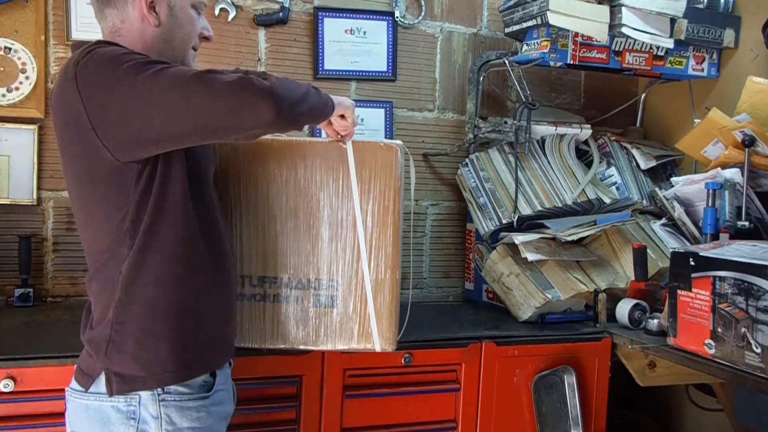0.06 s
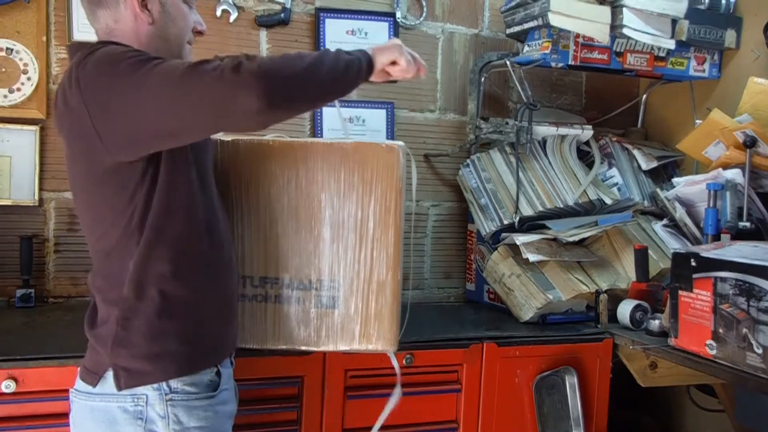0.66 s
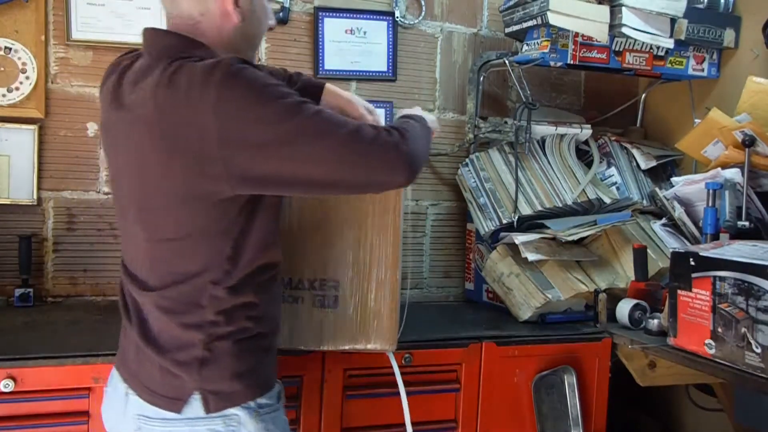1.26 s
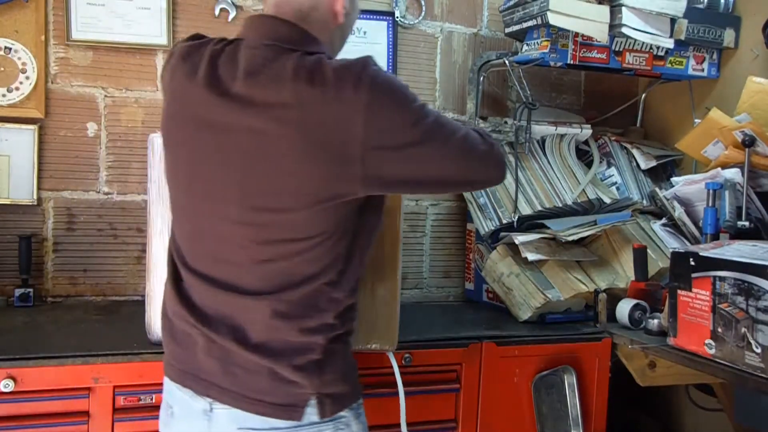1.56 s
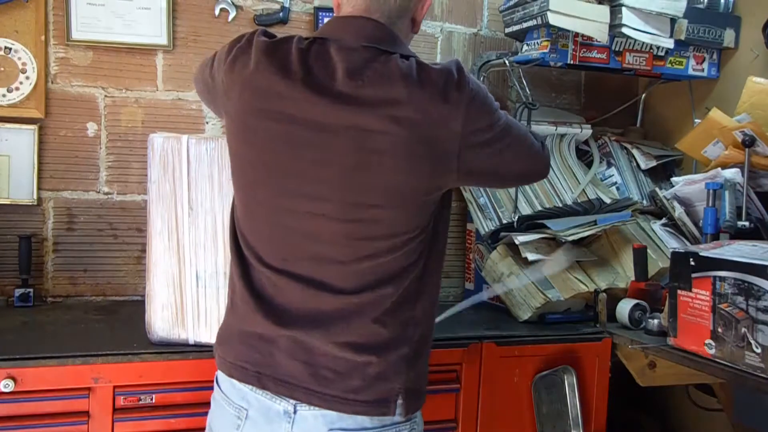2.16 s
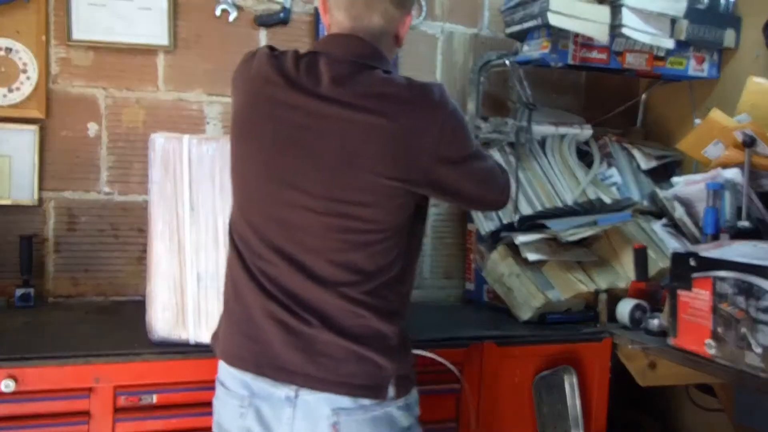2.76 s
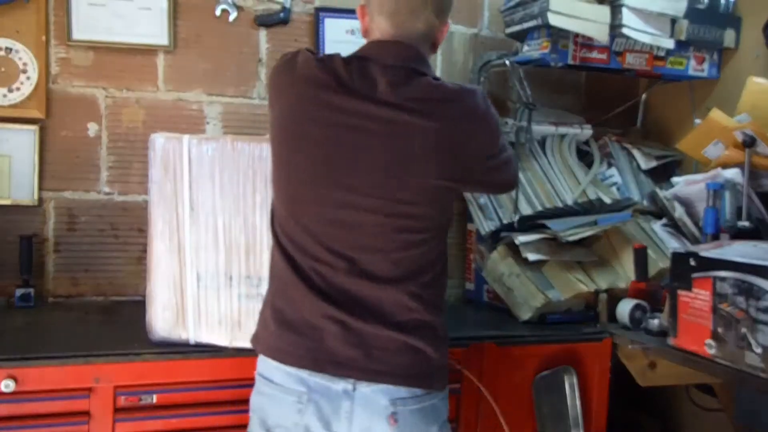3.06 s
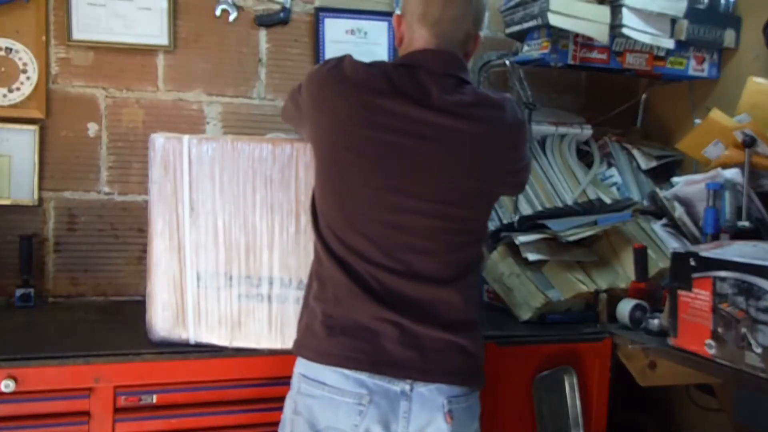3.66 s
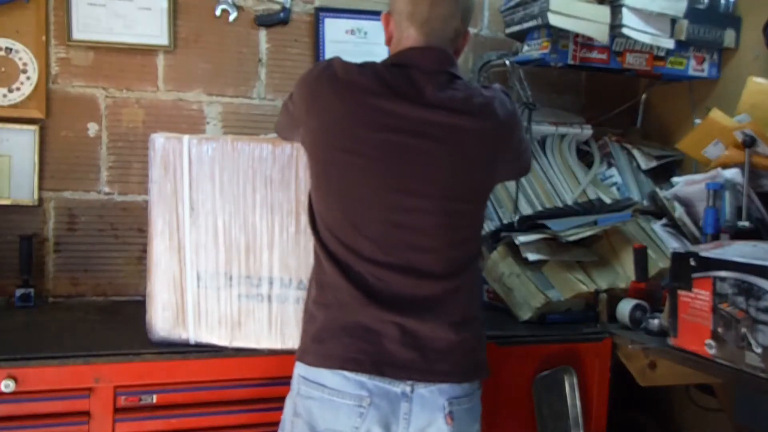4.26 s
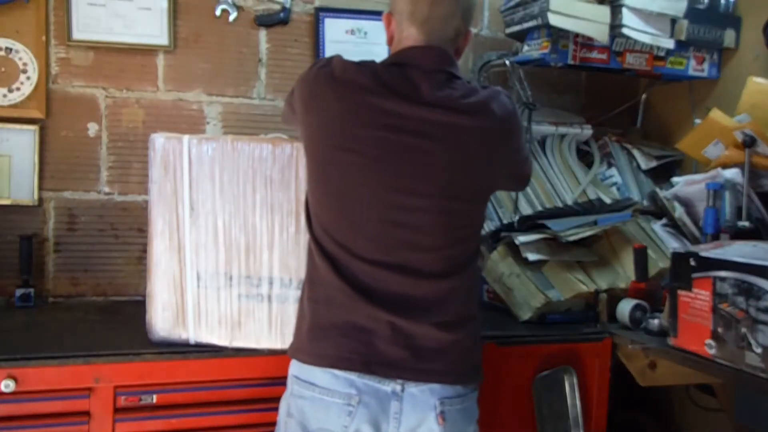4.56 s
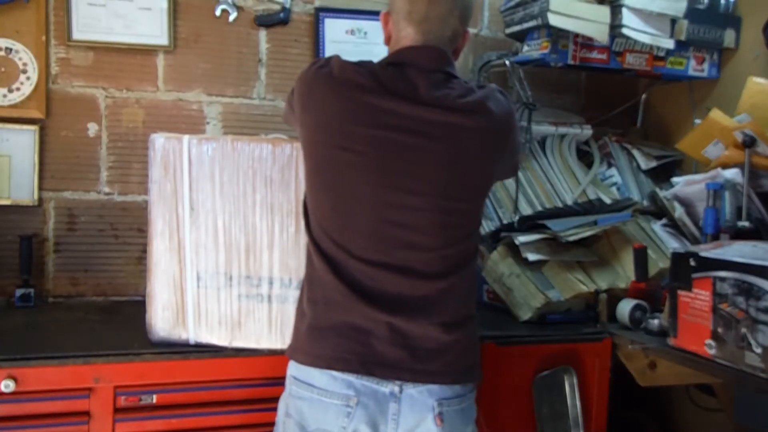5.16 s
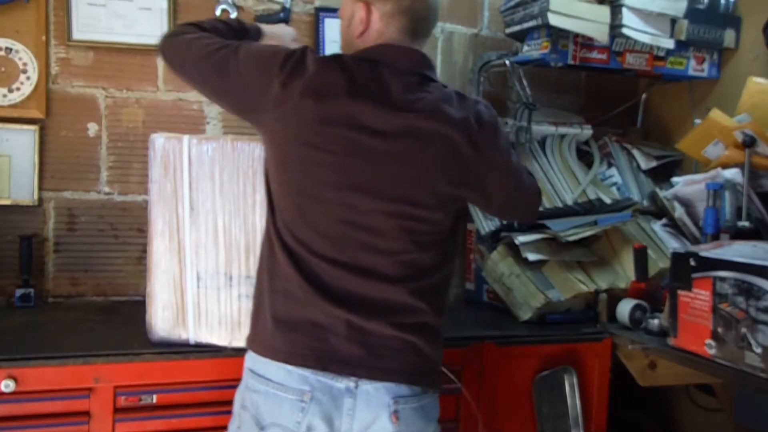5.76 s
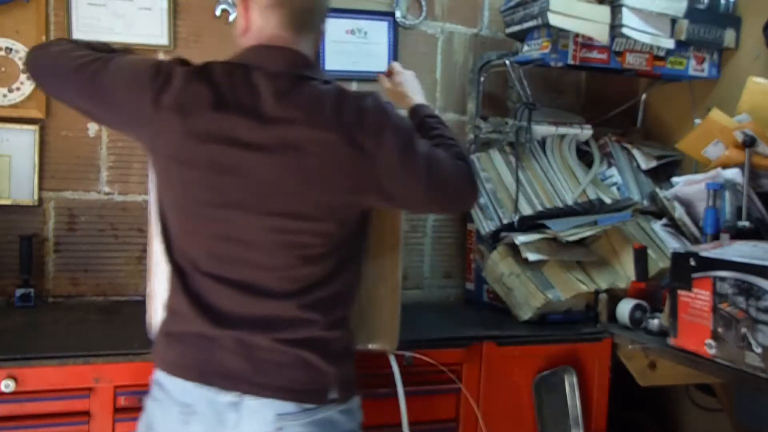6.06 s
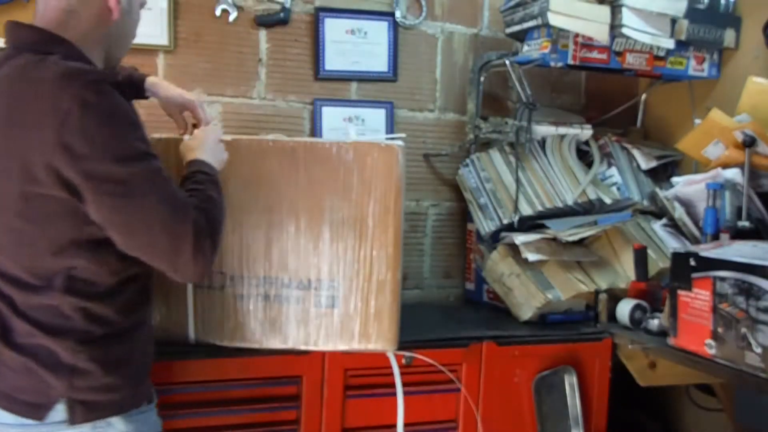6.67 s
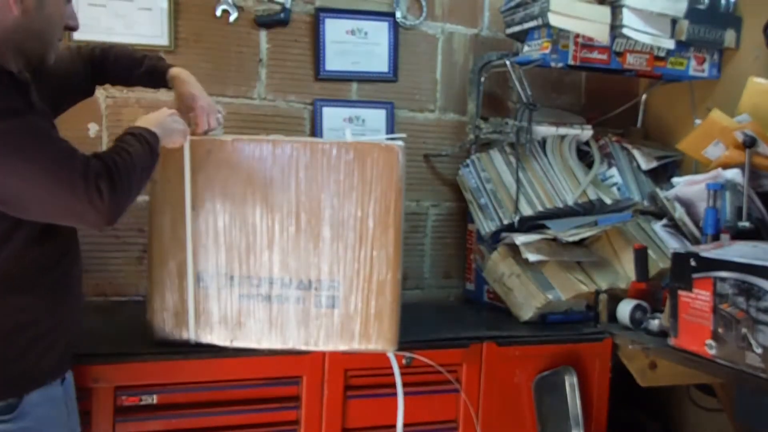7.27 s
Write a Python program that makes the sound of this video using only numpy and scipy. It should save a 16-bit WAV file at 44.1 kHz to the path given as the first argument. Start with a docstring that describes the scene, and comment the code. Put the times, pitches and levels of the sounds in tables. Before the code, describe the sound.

A faint rumble and hiss fill a workshop. At about 0.4 seconds a tight plastic strap snaps loudly and whips a shrink-wrapped cardboard box, then drags over the film with a thin squeak. Soft bumps and a sleeve swish follow, and a few sharp snaps come around 2 seconds, trailed by light crinkling. Near 2.8 seconds a strap cracks hard against the workbench, the hollow box bumps a few times and a small steel part clinks. More snaps come just after 4 seconds. From about 5.2 to 5.5 seconds a strap is drawn from under the box in one loud, crackling rasp. Between 6 and 7 seconds there are softer bumps, sleeve brushes, crinkling drags and small snaps. A last sharp snap with a faint squeak lands at about 7.4 seconds. The room answers each blow with a short echo.

```python
"""Plastic straps are cut and pulled off a shrink-wrapped cardboard box in a cluttered workshop.
Over a faint rumble and hiss, a tight strap snaps and whips the box, then drags and squeaks on the film.
A sleeve brushes past and more snaps follow. Near 3 s a strap hits the bench, the hollow box bumps
and a small steel part clinks. Just after 5 s one long, rasping pull draws a strap from under the box.
Softer bumps, drags and snaps end the scene. The room answers the blows with a short echo."""
import sys
import numpy as np
from scipy import signal
from scipy.fft import rfft, irfft
from scipy.io import wavfile
from scipy.ndimage import uniform_filter1d

SR = 44100
rng = np.random.default_rng(int(sys.argv[2]) if len(sys.argv) > 2 else 0)


def persist_wave(psi):
    """Save psi, clipped to +-1, as 16-bit WAV."""
    counts = np.round(np.clip(psi, -1, 1) * 32767).astype(np.int16)
    wavfile.write(sys.argv[1], SR, np.atleast_2d(counts).T)


N = 326423
TAPS = 4096  # samples in one click
HZ = np.fft.rfftfreq(TAPS, 1 / SR)  # the frequencies at which a click's colour (tone balance) is set

# the worker stands between box and microphone: (time [s], share of the box hidden [0-1])
SHADOW = [(1.2, 0.13), (1.7, 0.43), (6.2, 0.29), (6.9, 0.14)]


def amp(db):
    """Turns decibels into a factor to multiply by."""
    return 10 ** (np.asarray(db) / 20)


def unit_level(x):
    """Scales a signal to an average (rms) level of 1."""
    return x / np.sqrt(np.mean(x ** 2) + 1e-20)


def wobble(length, smoothing):
    """A random wavering; smoothing over more samples makes it slower."""
    return unit_level(uniform_filter1d(rng.standard_normal(length), size=smoothing))


def look_up(points, hz):
    """Reads between the rows of a table, on a logarithmic frequency scale."""
    row_hz, value = np.transpose(points)
    return np.interp(np.log(hz + 1), np.log(row_hz + 1), value)


def add(mix, s, sound):
    """Mixes a sound in at s seconds."""
    at = round(s * SR)
    sound = sound[max(-at, 0):]
    part = mix[max(at, 0):][:len(sound)]
    part += sound[:len(part)]


def noise(colour):
    """Steady noise of a given colour."""
    gain = amp(look_up(colour, np.fft.rfftfreq(N, 1 / SR)))
    return unit_level(irfft(rfft(rng.standard_normal(N)) * gain, N))


def resonances(peaks):
    """The boost in dB around an object's natural tones, at most 8 dB from each."""
    return sum(min(db, 8) / (1 + (2 * (HZ - hz) / width) ** 2) for hz, width, db in peaks)


def tint(body_db, treble_db, body_hz=1400, treble_hz=6100):
    """Contact with the box adds body (low tones); a sharper release adds treble (high tones)."""
    return body_db / (1 + (HZ / body_hz) ** 4) + treble_db / (1 + (treble_hz / (HZ + 1)) ** 12)


def click(colour_db):
    """The shortest click with this colour, holding the energy of one millisecond at 0 dB."""
    log_gain = np.log(amp(np.r_[colour_db, colour_db[-2:0:-1]]))
    spectrum = np.exp(np.conj(signal.hilbert(log_gain)))  # packs the energy at the start
    pulse = np.fft.ifft(spectrum).real
    return pulse / np.linalg.norm(pulse) * np.sqrt(SR / 1000)


def scuff(length_s):
    """A dying run of tiny slips that spreads a blow in time without colouring it."""
    t = np.arange(2 * TAPS) / SR
    spectrum = rfft(rng.standard_normal(len(t)) * np.exp(-t / length_s))
    for _ in range(3):  # make all frequencies equally strong, then fade again
        run = irfft(spectrum / (abs(spectrum) + 1e-12)) * np.exp(-t / (4 * length_s))
        spectrum = rfft(run)
    return run / np.linalg.norm(run)


def swell(rise_s, fall_s):
    """Gives the time to the peak and a curve that climbs 20 dB in rise_s and drops 20 dB in fall_s."""
    t = np.arange(-1.5 * rise_s, 2 * fall_s, 1 / SR)
    return -t[0], amp(-20 * np.where(t < 0, -t / rise_s, t / fall_s) ** 1.6)


def workshop(sound, s, room_db, clutter_db=9.5, clutter_s=0.035, build_s=0.0024):
    """The room passes on the direct sound, three near echoes and a short fading tail."""
    fade_times = [(100, 0.77), (220, 0.49), (450, 0.29), (1000, 0.36), (2700, 0.29), (7000, 0.27),
                  (14000, 0.24)]  # the room's tail: (frequency [Hz], time to fade 60 dB [s])
    echoes = [(.0026, -4.5), (.0052, -15.5), (.0098, -17)]  # bench, wall, shelves: (delay [s], level against the tail [dB])
    hz, t, spectra = signal.stft(rng.standard_normal(SR // 2), SR, nperseg=256)
    tail = signal.istft(spectra * amp(-60 * t / look_up(fade_times, hz)[:, None]), SR, nperseg=256)[1]
    t = np.arange(len(tail)) / SR
    tail *= (1 - np.exp(-(t / build_s) ** 2)) * amp(clutter_db * np.exp(-t / clutter_s))
    response = amp(room_db) * tail / np.linalg.norm(tail)
    early = signal.unit_impulse(TAPS)
    for delay, db in echoes:  # rough surfaces smear each echo
        add(early, delay * rng.uniform(.9, 1.1), amp(db + room_db) * scuff(0.00037))
    # the worker's body dulls the first arrivals but not the tail
    hidden = np.interp(s, *np.transpose(SHADOW))
    loss_db = hidden * (-1 + tint(body_db=0, treble_db=-6))
    shade = click(loss_db)
    shade *= np.sqrt(np.mean(amp(loss_db) ** 2)) / np.linalg.norm(shade)
    add(response, 0, signal.fftconvolve(early, shade))
    return signal.fftconvolve(sound, response)


def background(air_db=-50.1, drift_hz=1.4):
    """Low rumble and hiss of the room, with the thin whine of electronics."""
    air_colour = [(12, -28), (20, 0), (248, -13), (328, -16.5), (367, -15), (558, -17), (718, -17),
                  (780, -17), (976, -18.5), (3340, -24), (6010, -24.5), (7310, -26), (7950, -20.5),
                  (8650, -26.5), (16000, -29.5)]  # rumble and hiss: (frequency [Hz], level [dB])
    whine_tones = [(5809, -73), (7838, -63.5), (7897, -70.5), (15735, -65)]  # electronics: (pitch [Hz], level [dB])
    out = amp(air_db) * noise(air_colour)
    for hz, db in whine_tones:
        pitch = hz + drift_hz * wobble(N, smoothing=3000)
        out += amp(db) * unit_level(np.sin(2 * np.pi * np.cumsum(pitch) / SR))
    return out


def sleeve_brushes(catch_db=1.5):
    """Countless cloth fibres slide over the film in a soft swish, catching a little as they go."""
    strokes = [(1.575, 0.092, 0.13, -46.5), (1.67, 0.082, 0.21, -53), (6.21, 0.054, 0.079, -43.5),
               (7.10, 0.17, 0.13, -40.5)]  # passes of the sleeve: (peak time [s], rise [s], fall [s], level [dB])
    cloth_colour = [(40, -24), (300, -5), (900, -3), (1500, -2), (2500, -0.5), (4000, -6), (6500, -14),
                    (16000, -28)]  # rubbing cloth: (frequency [Hz], level [dB])
    pressure = np.zeros(N)
    for s, rise, fall, db in strokes:
        lead_s, shape = swell(rise, fall)
        add(pressure, s - lead_s, amp(db) * shape)
    return pressure * amp(catch_db * wobble(N, smoothing=300)) * noise(cloth_colour)


def steel_clinks():
    """A small steel part rings with three high tones after each touch."""
    touches = [(2.755, -43, -4), (2.7842, -22, -6), (2.827, -23.5, 1), (2.892, -31, -8)]  # taps on the steel: (time [s], level [dB], change to upper tones [dB])
    steel_tones = [(7550, 3, 0.067), (8113, 0, 0.11), (11200, -13, 0.092)]  # its ring: (pitch [Hz], level [dB], time to fade 60 dB [s])
    out, t = np.zeros(N), np.arange(SR // 2) / SR
    for s, db, upper_db in touches:
        for k, (hz, tone_db, fade_s) in enumerate(steel_tones):
            ring = workshop(amp(-60 * t / fade_s) * np.sin(2 * np.pi * hz * t), s, room_db=-4)
            add(out, s, amp(db + tone_db + upper_db * (k > 0)) * ring / abs(ring).max())
    return out


def strap_squeaks(waver=0.0058, stutter_db=3):
    """A strap edge sticks and slips on the film, giving a thin whistle that wavers and stutters."""
    # squeaking strokes: (peak time [s], rise [s], fall [s], level [dB], pitch [Hz])
    squeaks = [(0.765, 0.25, 0.029, -50.5, 5280), (0.755, .08, .04, -56, 4160),
               (0.7912, .0014, 0.002, -32, 5970), (2.54, 0.045, 0.034, -57, 5400),
               (2.73, 0.046, 0.026, -55, 5200), (3.9922, .001, .002, -39, 5100),
               (7.34, 0.041, 0.045, -48, 5240)]
    out = np.zeros(N)
    grip = amp(stutter_db * wobble(N, smoothing=700))
    for s, rise, fall, db, pitch_hz in squeaks:
        lead_s, shape = swell(rise, fall)
        hz = pitch_hz * (1 + waver * wobble(len(shape), smoothing=120))
        whistle = unit_level(np.sin(2 * np.pi * np.cumsum(hz) / SR))
        add(out, s - lead_s, amp(db) * shape * whistle)
    return out * unit_level(grip)


def box_blow(dull_hz, scuff_s, bass_db=0):
    """One blow on the box; softer contact leaves only its low, hollow tones."""
    box_colour = [(25, -15), (70, -6.5), (110, -12), (160, -2.5), (300, -2.5), (900, -0.5), (2000, 2.5),
                  (16000, -3.5)]  # struck cardboard: (frequency [Hz], level [dB])
    hollow_tones = [(163, 19, 3.5), (230.2, 19, 7), (263, 6.7, 2.5), (446.7, 23, 7), (567, 37, 5),
                    (697, 15, 3.5), (876, 30, 14.5)]  # air and walls of the box: (pitch [Hz], width [Hz], boost [dB])
    soft_db = -10 * np.log10(1 + (HZ / dull_hz) ** 6)
    colour = look_up(box_colour, HZ) + resonances(hollow_tones) + soft_db
    return signal.fftconvolve(click(colour + tint(bass_db, 0, body_hz=380)), scuff(scuff_s))


def box_bumps(judder_s=0.025, build_share=0.55, db_per_octave=17.5):
    """The shoved box judders over the bench in blows that weaken and dull until it settles."""
    # shoves: (time of hardest blow [s], level [dB], dull above [Hz], time to drop 20 dB [s], bass [dB])
    shoves = [(0.53, -38, 300, 0.11, 0), (1.222, -33, 400, 0.02, 0), (1.298, -33, 480, 0.05, 0),
              (2.395, -34.5, 520, 0.09, 0), (2.779, -13.5, 920, 0.15, -2), (2.9, -22, 563, 0.05, 0),
              (3.003, -13.5, 920, 0.03, 0.5), (3.05, -28, 450, 0.035, 0), (4.005, -38, 750, 0.08, -8),
              (5.935, -31.5, 860, 0.075, -6), (6.09, -32, 590, 0.055, -1), (6.547, -31.5, 490, 0.068, -2),
              (6.68, -36.5, 1000, 0.06, -10), (6.736, -25.5, 490, 0.038, 0.5), (7.137, -29, 430, 0.06, 3)]
    out = np.zeros(N)
    for s, db, dull_hz, settle_s, bass_db in shoves:
        slide = np.zeros(SR // 2)
        for k, jitter in enumerate(rng.uniform(-0.1503, 0.148, size=7), -1):  # blow 0 is the hardest
            at = judder_s * (k + jitter * (k > 0))
            loss_db = min(20 * (max(at, -at / build_share) / settle_s) ** 2.14, 60)
            blow = box_blow(dull_hz / 2 ** (loss_db / db_per_octave), scuff_s=0.009, bass_db=bass_db)
            add(slide, at + judder_s, amp(-loss_db) * blow)
        add(out, s - judder_s, amp(db) * workshop(slide, s, room_db=1))
    return out


def film_crinkle(s, shape, tint_db, slips_per_s, spread_db):
    """Film and strap stick and slip: many tiny clicks of uneven size follow a loudness curve."""
    film_colour = [(40, -36), (150, -26), (450, -8), (750, -10.5), (1200, -4), (2400, -1.5), (5000, -1),
                   (6200, -8.5), (8200, -9), (11000, -17.5), (16000, -30)]  # the film letting go: (frequency [Hz], level [dB])
    chance, size, sign = rng.random((len(shape), 3)).T
    size_db = spread_db * np.minimum(-np.log(size + 1e-9), 4)  # many small slips, a few big ones
    slips = shape * (chance < slips_per_s / SR) * np.sign(sign - .5) * amp(size_db)
    slips *= np.linalg.norm(shape) / (np.linalg.norm(slips) + 1e-9)
    one_slip = workshop(click(look_up(film_colour, HZ) + tint_db), s, room_db=4)
    return signal.fftconvolve(slips, one_slip / np.linalg.norm(one_slip))


def strap_drags(body_db=3.5):
    """A strap drags over the film in short, crinkling strokes that swell and fade."""
    # strokes of the strap: (peak time [s], rise [s], fall [s], level [dB], treble [dB])
    strokes = [(0.005, 0.022, 0.016, -39, 8), (0.73, 0.22, 0.19, -49.5, 0), (1.161, 0.046, 0.022, -45.5, 7),
               (1.302, 0.056, 0.064, -41.5, 4), (2.002, 0.033, 0.012, -27.5, 20),
               (2.231, 0.017, 0.053, -38.5, 5), (2.38, 0.12, 0.11, -40, 8), (2.475, 0.04, 0.082, -41.5, 6),
               (2.62, 0.08, 0.08, -45, 4), (2.789, 0.06, 0.013, -34, 3), (3.989, 0.024, 0.11, -38, 7.5),
               (4.141, 0.055, 0.013, -25.5, 16), (5.102, 0.027, 0.012, -26.5, 8),
               (5.66, 0.11, 0.038, -47, 4), (5.849, 0.041, 0.019, -44.5, 4), (6.56, 0.02, 0.21, -42.5, 8.5),
               (6.73, 0.042, 0.06, -32, 9.5), (6.97, 0.048, 0.054, -41, 10), (7.12, 0.08, 0.12, -40, 5),
               (7.349, 0.15, 0.045, -43.5, 8)]
    out = np.zeros(N)
    for s, rise, fall, db, treble_db in strokes:
        lead_s, shape = swell(rise, fall)
        crinkle = film_crinkle(s, shape, tint(body_db, treble_db), slips_per_s=750, spread_db=4.5)
        add(out, s - lead_s, amp(db) * crinkle)
    return out


def long_pull(edge_hz=2050, edge_width_hz=1000, edge_db=4.5):
    """A strap rasps over the box's edge with the effort; the film's fine hiss follows more gently."""
    effort = [(5.21, -43), (5.216, -25), (5.238, -34.5), (5.278, -16), (5.394, -27.5), (5.402, -24),
              (5.436, -43), (5.446, -29), (5.48, -44.5)]  # drawing a strap from under the box: (time [s], effort [dB])
    times, levels = np.transpose(effort)
    out, start = np.zeros(N), times[0]
    effort_db = np.interp(np.arange(start, times[-1], 1 / SR), times, levels)
    rasp_tint = tint(body_db=-5, treble_db=-4) + resonances([(edge_hz, edge_width_hz, edge_db)])
    hiss_tint = tint(body_db=7.5, treble_db=15)
    rasp = film_crinkle(start, amp(effort_db - 2.8), rasp_tint, slips_per_s=600, spread_db=4.5)
    hiss = film_crinkle(start, amp(0.5 * effort_db - 21), hiss_tint, slips_per_s=1500, spread_db=6)
    add(out, start, rasp + hiss)
    return out


def strap_lashes(rise_s=0.0014):
    """A freed strap whips the side of the box or the bench and sets it ringing."""
    hits = [(0.4385, -4.3, 0), (2.069, -22.5, 0), (2.227, -38, 0), (2.815, -33, 1), (2.8286, -13.5, 1),
            (5.292, -29, 0), (7.362, -43, 0)]  # where the strap lands: (time [s], level [dB], target [0 box, 1 bench])
    # cardboard's close tones die fast and blur into a knock: (pitch [Hz], level [dB], 60 dB fade [s])
    side_tones = [(960, -6, .11), (1062, -2, .12), (1120, -2, .12), (1210, -3, .12), (1293, 0, .13),
                  (1345, -3, .12), (2237, 2, .1), (2392, 1, .1), (2444, 0, .1), (2815, -3, .1),
                  (2915, -1, .11)]
    bench_tones = [(1044, -11, 0.34), (1105, -13, .23), (1400, 7.5, 0.16), (1983, -2.5, 0.32),
                   (2660, -22, 0.16), (2840, -9, 0.37), (3150, -2, .15), (3660, 4, 0.12), (4330, -13, 0.21),
                   (4170, 3, 0.17)]  # the bench's ring: (pitch [Hz], level [dB], 60 dB fade [s])
    out, t = np.zeros(N), np.arange(SR // 2) / SR
    for s, db, on_bench in hits:
        tones = bench_tones if on_bench else side_tones
        ring = sum(amp(tone_db - 60 * t / fade_s) * np.sin(2 * np.pi * (hz * t + rng.random()))
                   for hz, tone_db, fade_s in tones)
        add(out, s, amp(db) * ring * (1 - np.exp(-t / rise_s)) / np.sqrt(len(tones)))
    return out


def strap_snaps(crack_s=0.00036, tear_s=0.0012, thump_hz=660, thump_lag_s=0.001):
    """A strap lets go with a brief crack and tugs the box; the tighter it was, the longer it tears."""
    snaps = [(0.054, -39, -4, 3), (0.4325, -4.5, -12, -6), (0.4367, -1.5, 4, 1.5), (0.904, -36, 2, 3),
             (1.300, -31, 5, 1.5), (1.809, -42, -20, 2), (2.003, -16.5, 7, -1), (2.0073, -17.5, 10, 1.5),
             (2.067, -13.5, -2, -3.5), (2.0883, -19, -3, 5.5), (2.230, -33.5, 9, 2), (2.448, -28.5, -11, 0),
             (2.647, -34, 5, 0), (2.815, -14, -15, -14), (2.8268, -3.3, 5, -6.5), (2.834, -12, 11, -22),
             (3.001, -29, 7, -40), (3.43, -44.5, 4, -22), (3.699, -37.5, 3.5, 3), (3.759, -35, -23, 13),
             (4.065, -26.5, 5.5, 2.5), (4.1222, -21, 5, -4), (4.143, -12.8, 11, 6.5),
             (4.363, -39, -1.5, -1), (5.073, -36, -6, 17), (5.102, -19.5, -2, 2), (5.2139, -23, -9, -2.5),
             (5.261, -14.5, -12, -11), (5.2758, -13.5, -11, -10), (5.2919, -12, -13, -12),
             (5.327, -22, -6, 3), (5.4012, -20, -3, 6), (5.4435, -19, 7, -5), (6.551, -37, -10, 2),
             (6.631, -33, -7, 8.5), (6.7107, -22.5, -11, 8), (7.133, -30, 7, 4), (7.2137, -18, -8, -1.5),
             (7.362, -13, -4, -2)]  # straps letting go: (time [s], level [dB], body [dB], treble [dB])
    strap_colour = [(40, -31.5), (150, -16), (450, -14), (750, -10), (1200, -5.5), (1700, -6), (2400, -4),
                    (4500, -1), (6200, -2.5), (7800, -3.5), (10000, -9.5), (16000, -23)]  # cracking plastic: (frequency [Hz], level [dB])
    panel_tones = [(1165, 340, 4.5), (1510, 68, 4.5), (1960, 100, 3.5), (2396, 460, 5.5), (2980, 250, 4),
                   (3230, 160, 2)]  # panels of the box: (pitch [Hz], width [Hz], boost [dB])
    out, colour = np.zeros(N), look_up(strap_colour, HZ) + resonances(panel_tones)
    for s, db, body_db, treble_db in snaps:
        release = click(colour + tint(body_db, treble_db))
        crack = signal.fftconvolve(release, scuff(crack_s + tear_s * amp(db)))
        hidden = np.interp(s, *np.transpose(SHADOW))
        room_db = -2 - 0.14 * db + 11 * hidden  # weak or hidden snaps have a larger share of echo
        add(out, s, amp(db) * workshop(crack, s, room_db))
        thump = box_blow(thump_hz * 2 ** (db / 45), scuff_s=0.007)  # duller for a weaker snap
        thump_db = -26.5 + 0.5 * db + body_db
        add(out, s + thump_lag_s, amp(thump_db) * workshop(thump, s, room_db=1))
    return out


def scene():
    """Everything at the bench, heard by one microphone."""
    straps = strap_snaps() + strap_lashes() + strap_drags() + long_pull()
    mix = straps + sleeve_brushes() + box_bumps() + strap_squeaks() + steel_clinks() + background()
    return mix[None]


def record(dry):
    """The hardest snaps overload the input and are clipped; then the highest treble is cut."""
    clipped = np.clip(dry, -1, 1)
    low_pass = signal.firwin(511, cutoff=16300, window=("kaiser", 9), fs=SR)
    return signal.oaconvolve(clipped, low_pass[None], "same")


dry = scene()
out = record(dry)
persist_wave(out)
```